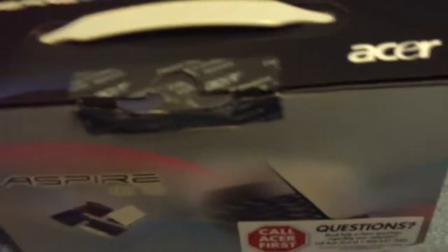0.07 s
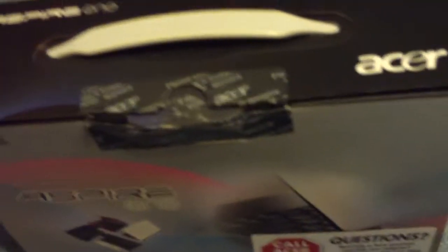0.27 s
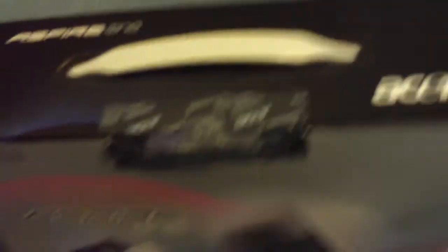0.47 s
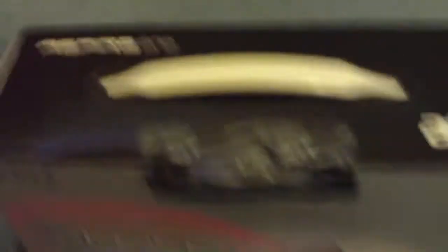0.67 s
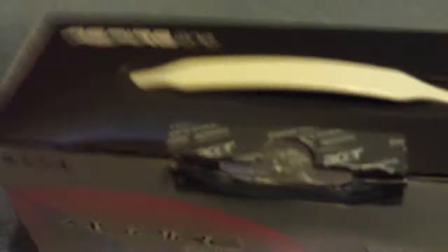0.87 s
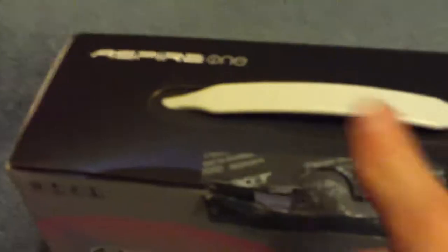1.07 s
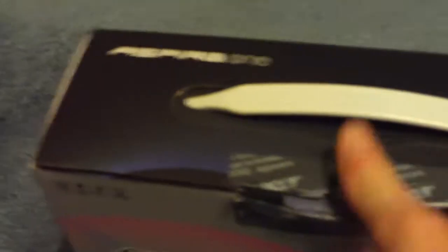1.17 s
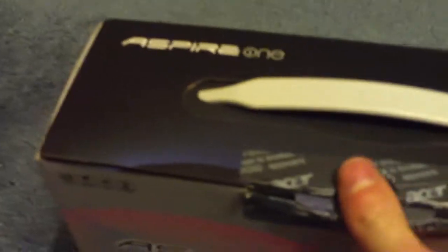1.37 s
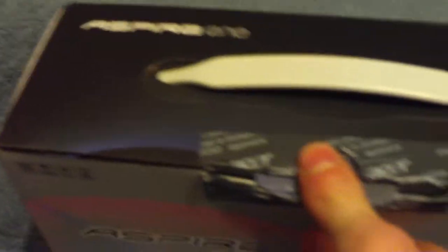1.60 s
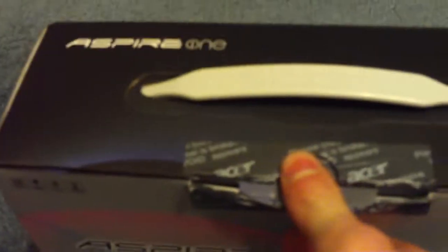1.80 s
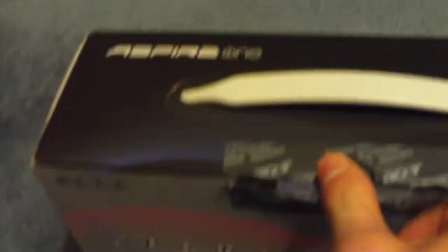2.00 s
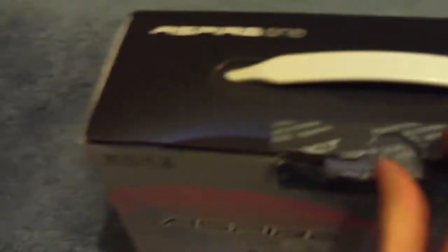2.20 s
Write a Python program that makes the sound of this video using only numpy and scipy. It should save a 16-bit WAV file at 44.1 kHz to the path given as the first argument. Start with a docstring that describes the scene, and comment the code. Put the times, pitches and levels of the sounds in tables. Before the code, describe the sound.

Tape on a cardboard box is scratched and rubbed, with light knocks over a low hum.

```python
"""Mains hum, room noise and the rumble of a hand-held microphone run throughout, in a quiet room.
From 0.2 to 0.9 s a hand shifts a taped cardboard box: the cardboard gives with knocks,
the loose tape crackles, a nail scratches and fingers drag.
From 1.2 s a thumb picks at the tape, rubbing in small slips among softer knocks.
Every touch rings the hollow box."""
import sys
import numpy as np
from scipy import signal
from scipy.fft import rfft, irfft
from scipy.io import wavfile

SR = 44100
rng = np.random.default_rng(int(sys.argv[2]) if len(sys.argv) > 2 else 0)


def output_pcm(signal):
    """Save a mono or channel-first signal as 16-bit PCM at the path in sys.argv[1].

    Samples are clipped to [-1, 1] before scaling.
    """
    pcm = np.clip(np.atleast_2d(signal).T, -1, 1) * 32767
    wavfile.write(sys.argv[1], SR, np.round(pcm).astype(np.int16))


N = 99225
TIME = np.arange(N) / SR


def from_db(db):
    """Decibels to gain."""
    return 10 ** (np.asarray(db) / 20)


def unit_rms(x):
    """Scale to rms 1."""
    return x / np.sqrt(np.mean(x ** 2) + 1e-20)


def coloured(x, colour):
    """Shape the spectrum, 12 dB/octave skirts beyond the ends; rms 1."""
    hz, db = np.transpose(colour)
    bins_hz = np.maximum(np.arange(N + 1) * SR / (2 * N), 1)
    skirts = np.minimum(bins_hz / hz[0], 1) ** 2 * np.minimum(hz[-1] / bins_hz, 1) ** 2
    gain = from_db(np.interp(np.log(bins_hz), np.log(hz), db))
    return unit_rms(irfft(rfft(x, 2 * N) * skirts * gain)[:N])


def buckles(rows, noise_ratio, sag, band_ratio):
    """A patch gives way: a few cycles plus a noise burst, pitch sagging as the bend relaxes."""
    out, t = np.zeros(N + SR), TIME[:SR // 20]
    for start_s, level_db, pitch_hz, swell_ms in rows:
        age = t / (swell_ms / 1000)
        envelope = (age * np.exp(1 - age)) ** 2
        glide_hz = pitch_hz * (1 + sag * (1 - np.minimum(age, 10)))
        swing = np.sin(2 * np.pi * np.cumsum(glide_hz) / SR)
        edges_hz = [pitch_hz / band_ratio, pitch_hz * band_ratio]
        band = signal.butter(2, edges_hz, "band", fs=SR, output="sos")
        noise = unit_rms(signal.sosfilt(band, rng.standard_normal(len(t))))
        burst = (swing + noise_ratio * noise) / np.hypot(1, noise_ratio)
        start = int(start_s * SR)
        out[start:start + len(t)] += from_db(level_db) * envelope * burst
    return out[:N]


def slips(levels, colour, rate_hz, hiss, spread_db=2.2):
    """Friction: tiny slips of uneven size over a smooth hiss."""
    sizes = from_db(spread_db * np.minimum(rng.exponential(1, N), 4)) * rng.choice([-1, 1], N)
    clicks = unit_rms(sizes * (rng.random(N) < rate_hz / SR))
    return level_curve(levels) * coloured(clicks + hiss * rng.standard_normal(N), colour)


def level_curve(levels):
    """Gain over time, linear in dB between points."""
    return from_db(np.interp(TIME, *np.transpose(levels)))


# cardboard buckles: start_s, level_db, pitch_hz, swell_ms
CARDBOARD_KNOCKS = [(.2175, -26, 1000, 1.04), (.2235, -36, 400, 4.5), (.5393, -25, 1480, 3.7),
                    (.5395, -9, 992, 1.46), (.5405, -26.5, 422, 4.1), (.5452, -13.5, 795, 1.43),
                    (.7186, -17.5, 1026, 1.2), (.7243, -20, 767, 1.3), (.7733, -17, 1143, 0.86),
                    (.8103, -6, 1400, 0.45), (.8108, -29, 773, 3.4), (.8125, -21.5, 1560, 0.63),
                    (.8135, -34.5, 350, 9.1), (.882, -33.5, 800, 2.6), (1.281, -38.5, 233, 5.5),
                    (1.398, -27, 505, 0.85), (1.4275, -32, 352, 1.7), (1.4278, -29, 746, 2),
                    (1.4535, -26, 766, 1.6), (1.454, -34, 1550, 1), (1.566, -26, 950, 2.5),
                    (1.568, -27, 270, 4.2), (1.576, -26.5, 830, 1.85), (1.6285, -32, 700, 0.62),
                    (1.643, -30, 750, 2.3), (1.7702, -30, 970, 2.1), (1.7996, -21, 778, 1.87),
                    (1.801, -21, 245, 2.04), (1.957, -33, 790, 1.55), (1.959, -25.5, 280, 3.7),
                    (2.045, -35, 278, 5), (2.173, -34.5, 218, 3.9)]
def cardboard_knocks():
    """Cardboard gives under the fingers, with a little torn-fibre noise."""
    return buckles(CARDBOARD_KNOCKS, noise_ratio=0.15, sag=0.044, band_ratio=1.86)


# tape buckles: start_s, level_db, pitch_hz, swell_ms
TAPE_SNAPS = [(0.2109, -24.5, 2620, 0.73), (0.2129, -23.5, 3020, 1), (0.232, -27, 2840, 1.2),
              (.7738, -26, 2700, 0.42), (0.8112, -16.5, 2220, 0.87), (0.8134, -18.5, 3120, 0.86),
              (0.844, -31.5, 3440, 0.99), (0.8691, -20, 2780, 0.85), (0.8752, -18.5, 2420, 0.56),
              (0.879, -15, 2475, 1.6)]
def tape_snaps(click_delay_s=0.0008, click_band_hz=(1210, 5240)):
    """Loose tape crinkles; its edge lets go with a sharp click."""
    crinkle = buckles(TAPE_SNAPS, noise_ratio=0.75, sag=0.03, band_ratio=1.6)
    clicks = np.zeros(N)
    for start_s, level_db, _, _ in TAPE_SNAPS:
        clicks[int((start_s + click_delay_s) * SR)] += from_db(level_db + 2)
    band = signal.butter(2, click_band_hz, "band", fs=SR, output="sos")
    return crinkle + signal.sosfilt(band, clicks + 1e-18)


# nail on tape: time_s, level_db
NAIL_LEVELS = [(.2, -58), (.22, -44), (.26, -87.5), (.36, -59), (.412, -33), (.428, -51.5), (.445, -40.5),
               (.48, -67), (.6, -56), (.65, -44), (.7, -54), (.805, -42), (.83, -69), (.878, -29.5),
               (.9, -77)]
# nail spectrum: freq_hz, gain_db
NAIL_COLOUR = [(800, -4.5), (1800, -19.5), (2900, 0), (3400, -5), (4100, -5), (5300, -9.5), (7000, -27)]
def nail_scratch():
    """A nail scratches the tape in dense, bright slips."""
    return slips(NAIL_LEVELS, NAIL_COLOUR, rate_hz=2900, hiss=0.25)


# fingers on cardboard: time_s, level_db
FINGER_LEVELS = [(.19, -63), (.22, -45.5), (.27, -78), (.41, -46), (.46, -48.5), (.6, -47), (.655, -37),
                 (.7, -58), (.745, -35.5), (.78, -43), (.795, -33.5), (.83, -35.5), (.85, -44.5),
                 (.88, -31.5), (.95, -66)]
# finger spectrum: freq_hz, gain_db
FINGER_COLOUR = [(150, -23), (380, -5), (550, -9.5), (800, -1), (1150, -6.5), (1500, -0.5), (1900, -13),
                 (3500, -18.5)]
def finger_drag():
    """Fingers slide on the box with smoother, midrange friction."""
    return slips(FINGER_LEVELS, FINGER_COLOUR, rate_hz=1400, hiss=0.82)


# thumb on tape: time_s, level_db
THUMB_LEVELS = [(1.2, -69), (1.285, -46), (1.34, -60.5), (1.41, -39.5), (1.46, -35), (1.51, -57),
                (1.55, -42), (1.582, -36.5), (1.615, -40), (1.64, -37), (1.7, -53), (1.825, -44.5),
                (1.88, -53), (1.94, -39.5), (2.01, -54.5), (2.17, -50.5), (2.25, -50)]
# thumb spectrum: freq_hz, gain_db
THUMB_COLOUR = [(120, 6), (210, -1), (330, 1.5), (500, -8.5), (750, -5.5), (1000, 0.5), (1300, -27.5),
                (1600, -16), (2500, -22)]
def thumb_rub():
    """The thumb rubs the tape in sparser, dull slips."""
    return slips(THUMB_LEVELS, THUMB_COLOUR, rate_hz=700, hiss=0.48)


# box resonances: freq_hz, gain_db, t60_s
BOX_MODES = [(197, -20.5, 0.041), (354, -21.5, 0.12), (428, 4, .09), (623, 1.5, 0.14), (776, -4, 0.045),
             (937, -2, 0.19), (1127, -4.5, 0.017), (1478, 1, 0.036), (1768, -1.5, .045), (2330, -6, 0.05),
             (3186, -1.5, 0.079), (4000, -2, 0.021)]
def box_ring(touch, trim_db=-0.5):
    """The hollow box rings after each touch, one resonator per mode."""
    out = np.zeros(N)
    for freq_hz, gain_db, t60_s in BOX_MODES:
        radius = from_db(-60 / (t60_s * SR))
        feedforward = np.array([1, 0, -1]) * (1 - radius ** 2) / 2
        feedback = [1, -2 * radius * np.cos(2 * np.pi * freq_hz / SR), radius ** 2]
        out += from_db(gain_db + trim_db) * signal.lfilter(feedforward, feedback, touch + 1e-18)
    return out


def room_tail(sound, t60_s=0.28, gap_s=0.0022, lowpass_hz=2580, gain_db=-17):
    """Short, dull reverberation of a carpeted room."""
    t = TIME[:SR // 2]
    tail = rng.standard_normal(len(t)) * from_db(-60 * t / t60_s) * (t > gap_s)
    tail /= np.sqrt(np.sum(tail ** 2))
    dull_tail = signal.sosfilt(signal.butter(1, lowpass_hz, fs=SR, output="sos"), tail)
    return from_db(gain_db) * signal.fftconvolve(sound, dull_tail)[:N]


# room noise spectrum: freq_hz, gain_db
ROOM_COLOUR = [(25, -8.5), (45, -7), (75, -8.5), (110, -8.5), (140, -11.5), (200, -9), (300, -14.5),
               (550, -15.5), (1000, -18), (2000, -20), (3300, -22), (4500, -26), (5600, -28), (6400, -30),
               (7300, -34)]
def room_noise(rms_db=-40.72):
    """Steady, bass-heavy noise of the room."""
    return from_db(rms_db) * coloured(rng.standard_normal(N), ROOM_COLOUR)


# mains partials: freq_hz, rms_db
HUM_PARTIALS = [(60, -49), (180, -63.5)]
def mains_hum():
    """Mains fundamental and third harmonic."""
    return sum(from_db(rms_db) * np.sqrt(2) * np.sin(2 * np.pi * (freq_hz * TIME + rng.random()))
               for freq_hz, rms_db in HUM_PARTIALS)


# microphone handling: time_s, level_db
HANDLING_LEVELS = [(0, -53), (.33, -54.5), (.49, -39.5), (.57, -43), (.67, -39), (.8, -43.5), (1.0, -53.5),
                   (2.25, -45.5)]
# handling spectrum: freq_hz, gain_db
HANDLING_COLOUR = [(25, -1), (50, -18.5), (95, -13), (150, -18), (500, -47)]
def handling_rumble():
    """The microphone rumbles as it moves in the hand."""
    return level_curve(HANDLING_LEVELS) * coloured(rng.standard_normal(N), HANDLING_COLOUR)


def scene():
    """Knocks, snaps and friction sound through the box into the room; mono."""
    touch = cardboard_knocks() + tape_snaps() + nail_scratch() + finger_drag() + thumb_rub()
    sound = touch + box_ring(touch)
    return (sound + room_tail(sound) + room_noise() + mains_hum() + handling_rumble())[None]


def record(dry):
    """The recorder rolls off the treble and cuts it steeply above."""
    rolloff_hz, cutoff_hz = 5465, 7200
    soft = signal.sosfilt(signal.butter(6, rolloff_hz, fs=SR, output="sos"), dry)
    return signal.sosfilt(signal.ellip(10, 0.3, 80, cutoff_hz, fs=SR, output="sos"), soft)


dry = scene()
out = record(dry)
output_pcm(out)
```